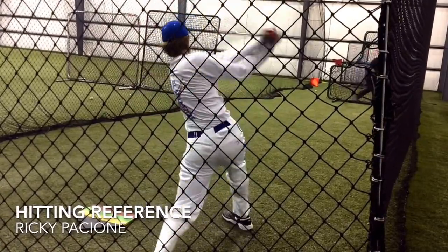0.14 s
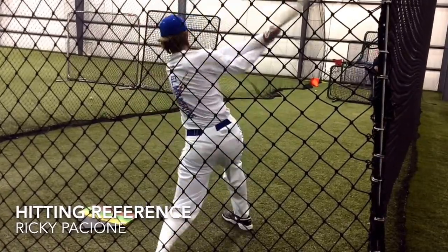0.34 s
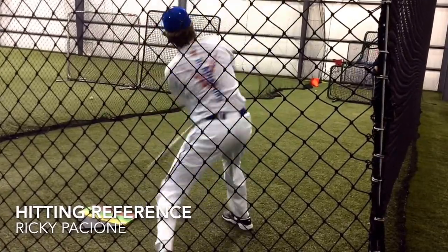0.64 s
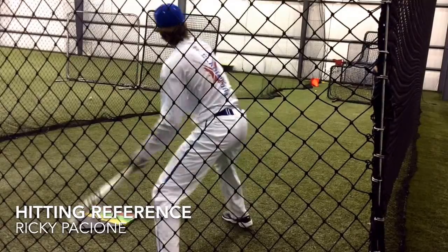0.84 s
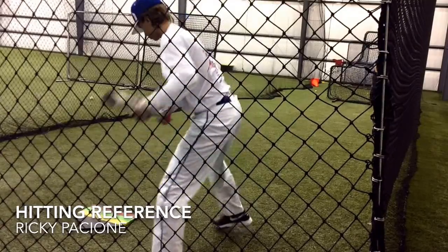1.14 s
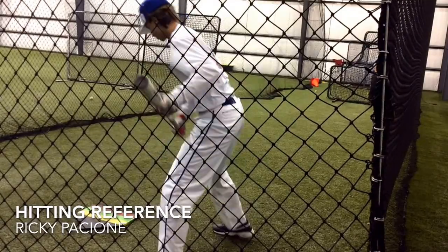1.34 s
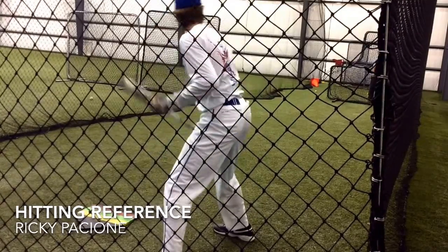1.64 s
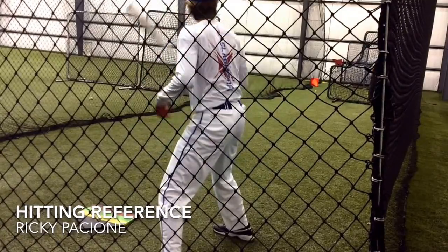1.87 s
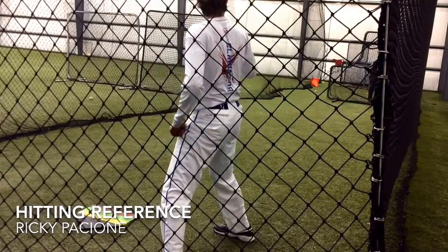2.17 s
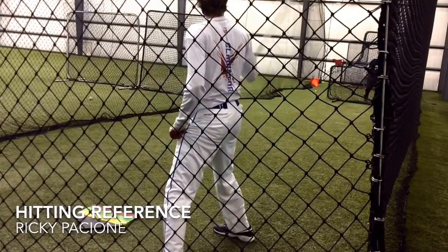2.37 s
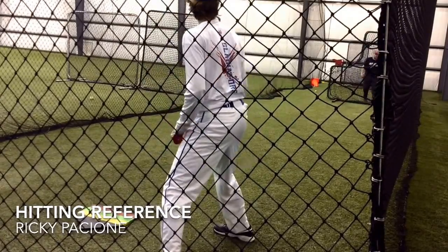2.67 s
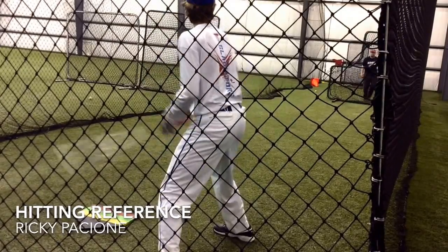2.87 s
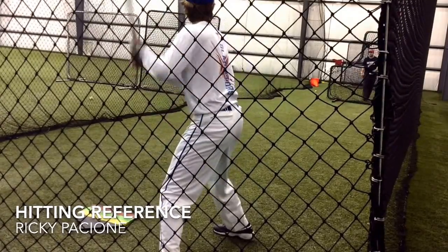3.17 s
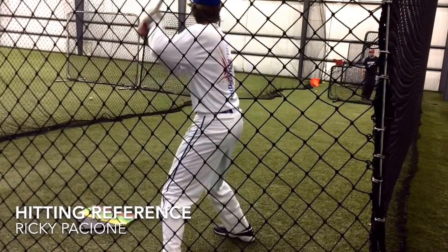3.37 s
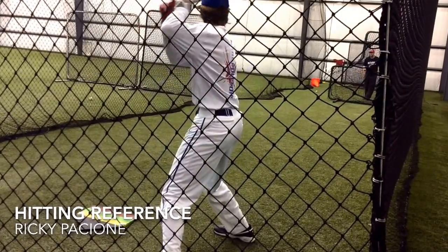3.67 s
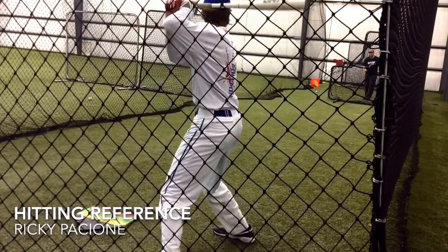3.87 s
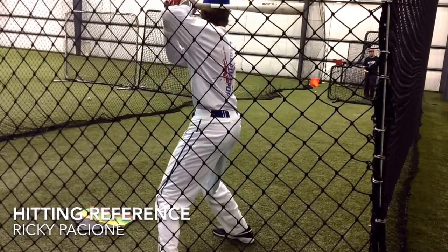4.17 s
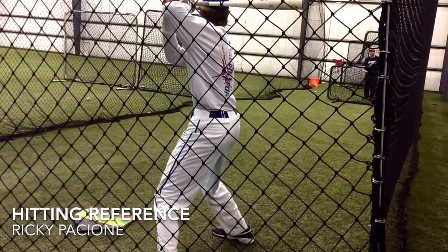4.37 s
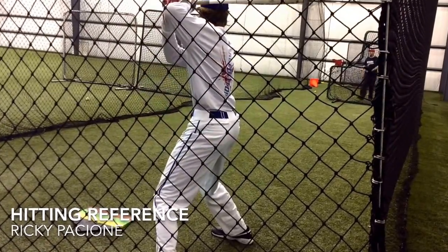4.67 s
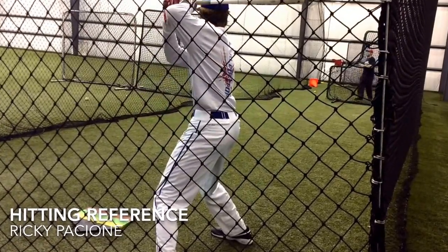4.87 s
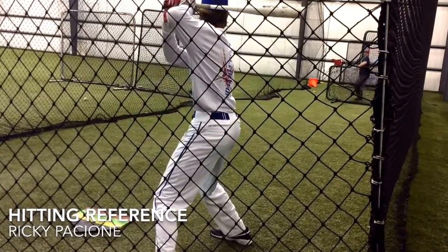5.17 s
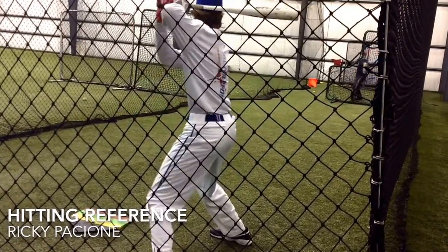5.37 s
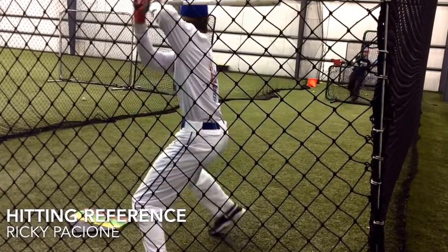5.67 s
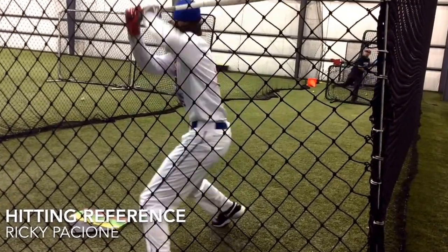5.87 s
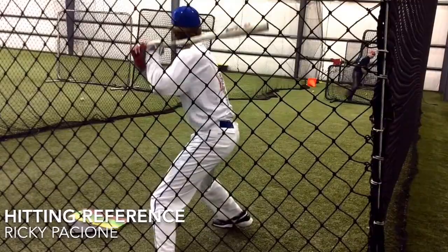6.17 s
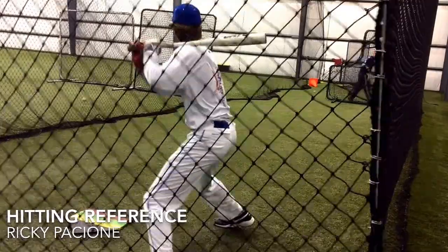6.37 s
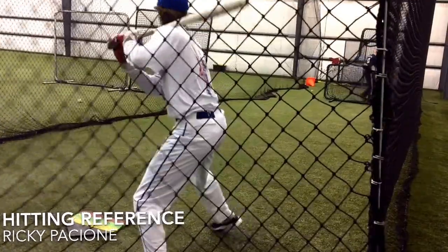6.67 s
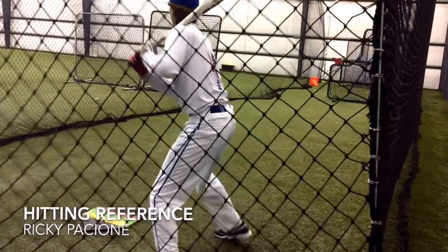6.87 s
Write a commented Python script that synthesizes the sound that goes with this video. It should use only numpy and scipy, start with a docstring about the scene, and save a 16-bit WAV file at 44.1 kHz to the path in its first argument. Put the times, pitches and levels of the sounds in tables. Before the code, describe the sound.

Right at the start, a metal bat hits a baseball with a sharp crack and a bright ring that echoes through a large hall for about a second. At 0.3 seconds the ball swishes faintly into a far net. Throughout, lamps buzz, a fan motor whines thinly and ventilation rumbles and hisses, all fairly quiet. A short dull thud on the turf comes at about 1.8 seconds, with much fainter taps around 2.8, 3.2 and 5.9 seconds. A low drone swells slightly around 3.5 seconds. At 6.4 seconds a pitch smacks loudly into the backstop right beside the microphone. The heavy sheet booms, knocks against its frame and flaps about four times, each weaker, while the netting rustles softly. Another small tap lands just before 7 seconds. The background dips briefly after both loud hits.

```python
"""Indoor batting cage, from behind the net.

A metal bat meets a ball and rings out through the hall; a few soft taps follow on the turf.
The next pitch smacks into the backstop beside the microphone, and the sheet booms, flaps and
knocks on its frame. Lamps buzz, a fan motor whines and the ventilation rumbles throughout.
The recorder's gain control ducks after both blows."""
import sys
import numpy as np
from scipy import signal
from scipy.fft import rfft, irfft, next_fast_len
from scipy.io import wavfile
from scipy.ndimage import uniform_filter1d, minimum_filter1d

SR = 44100
rng = np.random.default_rng(int(sys.argv[2]) if len(sys.argv) > 2 else 0)


def waveform_to_disk(signal):
    """Save audio, clipped to [-1, 1], as 16-bit WAV at the path in sys.argv[1]."""
    frames = np.transpose(np.atleast_2d(signal))
    scaled = np.clip(frames, -1, 1) * 32767
    samples = np.round(scaled).astype(np.int16)
    wavfile.write(sys.argv[1], SR, samples)


N = 310023
T = np.arange(N) / SR
LAMP_HZ, TOP_HZ = 120.05, 15400  # twice the mains rate; the recorder's upper limit
# blows on the backstop and its frame: (time [s], strength [dB], brightness [Hz])
BLOWS = [(6.4163, -5.5, 2200), (6.4177, -4.5, 18100), (6.4201, -16.5, 2500), (6.4241, -25, 8000),
         (6.427, -14.5, 9000), (6.46, -21.5, 4000), (6.468, -40, 2000), (6.493, -32, 3000),
         (6.520, -17, 800), (6.564, -25.5, 2510)]


def bat(direct_t60=0.14, tick_db=-19, tick_t60=0.055, build_s=0.0093):
    """The barrel's close modes beat and die quickly; the hall keeps each as a narrow, wavering band."""
    # barrel modes: (pitch [Hz], direct level [dB], hall level [dB], hall width [Hz], hall t60 [s])
    barrel = [(2460, -30, -25, 61, 1), (2493, -12, -21, 88, 0.48), (2702, -11, -21.5, 65, 1),
              (2764, -22, -29.5, 26, 0.91), (2916, -47, -27, 68, 1), (3630, -31, -32, 62, 0.6)]
    # the crack out in the hall: (frequency [Hz], octave level [dB], t60 [s])
    crack = [(100, -70, .5), (220, -49, 0.39), (424, -40.5, 0.33), (780, -29.5, 0.43), (1190, -32.5, 0.64),
             (1900, -23.5, 0.61), (3300, -22, 0.77), (4800, -32, 0.88), (8000, -31.5, 0.4),
             (11500, -31.5, 0.25), (15000, -49, 0.29)]
    # returns from walls and roof: (delay [s], level [dB])
    echoes = [(.033, -19), (0.058, -11), (.092, -12), (0.123, -24), (0.271, -20)]
    size = 2 * SR
    t = T[:size]
    ring = modes([(hz, db, direct_t60) for hz, db, *_ in barrel], size)
    out = ring + die_away(crack, size, late_db=-10.5, late_stretch=1.96)
    for hz, _, hall_db, width, t60 in barrel:
        out += undb(hall_db) * band(hz, width, size) * fade(t, t60) * rise(t, build_s)
    for s, db in echoes:
        # each surface smears the contact tick in its own way
        tick = noise(lambda f: np.exp(-np.log2(f / 1700) ** 2) / f, size) * fade(t, tick_t60)
        add(out, s, undb(db) * (ring + undb(tick_db) * tick))
    return out * np.minimum(t / 0.00094, 1)


def backstop(snap_db=12, scatter_db=-5, sting_swell_s=0.0005, build_s=0.0066):
    """Right by the microphone, each blow is a pulse, a short ring and a spray of near reflections."""
    # the smack, close up: (frequency [Hz], octave level [dB], t60 [s])
    smack = [(100, -33, 0.042), (220, -15, 0.082), (398, -28, 0.031), (734, -3.5, 0.036),
             (1090, -12.5, 0.088), (1720, -16, 0.023), (2640, -0.5, 0.036), (4260, -13, 0.029),
             (7600, -7.5, 0.039), (11500, -7, .014), (15000, -14, 0.014)]
    # its echo in the hall: (frequency [Hz], octave level [dB], t60 [s])
    smack_hall = [(45, -30, 0.58), (100, -30.5, 0.58), (200, -24, 0.42), (397, -23.5, 0.38),
                  (765, -29, 0.36), (1510, -27, 0.4), (2870, -26, 0.48), (4400, -36, 0.75),
                  (8000, -34.5, 0.46), (14000, -29.5, 0.18)]
    # modes of the backstop and its frame: (pitch [Hz], level [dB], t60 [s])
    frame = [(275, -15, 0.164), (366, -16, 0.14), (475, -12, 0.083), (640, -11.5, 0.014), (780, -7, 0.018),
             (863, -14, 0.054), (1270, -15, 0.031), (1490, -23, 0.028), (2330, -10, 0.027),
             (2940, -21, 0.037), (3340, -17, 0.026)]
    # the sting of the hardest blow: (centre [Hz], width [Hz], level [dB])
    sting = [(2590, 550, -8.5), (12500, 4300, -16.5)]
    out, t = np.zeros(N), T[:SR]
    for s, db, bright_hz in BLOWS:
        blow = undb(scatter_db) * die_away(smack, SR // 4) - modes(frame, SR // 4)
        add(blow, 0, undb(snap_db) * snap(smack))
        softness = signal.butter(1, bright_hz, fs=SR)  # a longer contact is duller
        add(out, s, undb(db) * signal.lfilter(*softness, blow))
    hardest_s = max(BLOWS, key=lambda blow: blow[1])[0]
    for hz, width, db in sting:
        add(out, hardest_s, undb(db) * swell(t, sting_swell_s) * band(hz, width, SR))
    hall = die_away(smack_hall, SR, late_db=-15, late_stretch=2.35)
    add(out, hardest_s, hall * rise(t, build_s))
    return out


def sheet(first_flap_s=6.555, swing_s=0.134, flap_db=-27, loss_db=3, shudder_db=-38):
    """The heavy sheet booms under the ball and shudders, then flaps once a swing, weaker each time."""
    # low modes of the sheet: (pitch [Hz], level [dB], lag behind the smack [s])
    booms = [(194, -14, 0.0005), (108.5, -13.5, 0.0188), (59, -22, 0.012)]
    # each flap in turn: (pitch [Hz])
    flap_pitches = [97.3, 143.6, 164.8, 135]
    out, t = np.zeros(N), T[:SR // 2]
    smack_s = BLOWS[0][0]
    for hz, db, lag in booms:
        boom = np.sin(2 * np.pi * hz * t) + 0.19 * band(hz, hz / 2, len(t))
        add(out, smack_s + lag, undb(db) * swell(t, peak_s=0.013) * boom)
    for k, hz in enumerate(flap_pitches):
        lower_mode = undb(-11.5) * np.sin(2 * np.pi * 0.627 * hz * t)
        flap = np.sin(2 * np.pi * hz * t) + lower_mode + 0.15 * band(hz, hz / 2, len(t))
        envelope = undb(flap_db - k * loss_db) * swell(t, peak_s=0.023)
        add(out, first_flap_s + k * swing_s, envelope * flap)
    shudder = fade(T[:SR], t60=2.8) * band(hz=130, width=90, size=SR)
    add(out, smack_s, undb(shudder_db) * shudder)
    return out


def taps(contact_s=0.00091, click_t60=0.026, hall_db=-26, hall_t60=0.41, click_hall_db=-14):
    """Bat, shoes and loose balls on the turf: a damped thud and a dull click, with a faint hall wash."""
    # taps: (time [s], thud level [dB], pitch [Hz], t60 [s], click strength [dB], click top [Hz])
    contacts = [(0.257, -44, 318, .08, -46, 1000), (1.826, -21.5, 364, 0.029, -43, 1500),
                (1.847, -33, 344, 0.04, -36, 2300), (1.879, -43, 380, 0.051, -53, 1800),
                (1.891, -46, 357, .04, -43, 1800), (2.825, -56, 654, .03, -50, 1500),
                (2.865, -55, 323, .05, -61, 1500), (3.171, -44.5, 386, 0.053, -54, 1200),
                (5.873, -47.5, 397, .04, -59, 1500), (6.9487, -27.5, 490, 0.015, -33.5, 4000),
                (6.991, -50, 450, .03, -37, 2500)]
    out, t = np.zeros(N), T[:SR // 2]
    wash = fade(t, hall_t60) * rise(t, 0.0076)
    for s, db, hz, t60, click_db, top_hz in contacts:
        thud = np.sin(2 * np.pi * hz * t) * fade(t, t60) * rise(t, contact_s)
        thud += undb(hall_db) * wash * band(hz, hz, len(t))
        click = noise(lambda f: 1 / (1 + (f / top_hz) ** 8), len(t))
        click *= fade(t, click_t60) + undb(click_hall_db) * wash
        add(out, s, undb(db) * thud + undb(click_db) * click / 2)
    return out


def far_net(arrival_s=0.28, give_s=0.0033):
    """The far net gives way gradually under the batted ball, so its swish has a soft start."""
    # the swish: (frequency [Hz], octave level [dB], t60 [s])
    swish = [(150, -62, 0.27), (322, -49, 0.26), (500, -68, 0.19), (850, -59, 0.17), (1300, -63, 0.23),
             (2200, -37, 0.39), (3600, -40, 0.49), (6000, -46, .5), (10000, -43.5, 0.32), (15000, -64, .25)]
    out = np.zeros(N)
    add(out, arrival_s, die_away(swish, SR) * rise(T[:SR], give_s))
    return out


def rustle(centre_hz=2200, octaves=1.4, patchy_db=4, attack_s=0.044, release_t60=0.67):
    """Cords and cloth rub in short uneven spurts; each rustle rises, holds and dies away."""
    # the batter's stride and the shaken net: (start [s], length [s], level [dB])
    moves = [(6.077, 0.45, -66), (6.53, 0.22, -53), (6.978, 0.06, -52)]
    spurts = undb(wander(patchy_db, per_second=200))
    rub = noise(lambda f: np.exp(-(np.log2(f / centre_hz) / octaves) ** 2) / f, N)
    motion = np.zeros(N)
    for s, length, db in moves:
        envelope = np.minimum(T / attack_s, 1) * fade(np.maximum(T - length, 0), release_t60)
        add(motion, s, undb(db) * envelope)
    return rub * spurts * motion


def lamps(scatter_db=1.5, waver=0.16):
    """Lamp ballasts overhead buzz at twice the mains rate; the hall scrambles the overtones' phases."""
    # outline of the buzz: (frequency [Hz], level per overtone [dB])
    buzz = [(120, -69.5), (240, -87), (1200, -77.5), (1450, -76.5), (1750, -85), (2400, -77.5),
            (3000, -77.5), (4200, -78), (5000, -81.5), (5500, -76.5), (6100, -70.5), (7500, -79),
            (9200, -79), (10000, -82), (12000, -79), (15000, -95.5)]
    # overtones at which the lamp housings resonate: (frequency [Hz], level [dB])
    housings = [(360, -72), (480, -83), (600, -76), (720, -77), (840, -77), (960, -74), (1080, -80),
                (2881, -73), (3842, -65), (3962, -74), (4442, -68), (5760, -71), (6002, -72), (6363, -67),
                (6603, -61), (6723, -59), (7083, -63), (7203, -60), (7803, -63), (7923, -66), (8043, -60),
                (8163, -61), (8404, -60), (8524, -67), (9244, -65), (9964, -72), (10084, -67), (10204, -66),
                (10324, -68), (10684, -72)]
    overtones = LAMP_HZ * np.arange(1, int(TOP_HZ / LAMP_HZ))
    levels = read(buzz, overtones) + scatter_db * rng.standard_normal(len(overtones))
    for hz, db in housings:
        levels[np.argmin(abs(overtones - hz))] = db
    return sum(tone(hz, db, waver) for hz, db in zip(overtones, levels))


def fan_motor(gain_db=1, waver=0.18):
    """The rotor slots give a thin, unsteady whine, with sidebands at twice the mains rate."""
    # lines of the whine: (frequency [Hz], relative level [dB])
    whine = [(1543, -81), (1783, -78), (2023, -65), (2143, -76), (2263, -84), (2383, -78), (2503, -84),
             (2623, -85), (3806, -76), (4166, -82), (4286, -83)]
    return sum(tone(hz, db + gain_db, waver) for hz, db in whine)


def ventilation(rumble_top_hz=300, sag_db_per_s=0.62, sizzle=0.2, drone_db=-53, peak_s=3.58):
    """Room tone: a slowly sinking rumble, a drone that swells once, a hiss that pulses with the lamps."""
    # hall air and ventilation: (frequency [Hz], octave level [dB])
    room_tone = [(25, -74), (55, -64), (110, -59.5), (190, -56), (250, -72.5), (330, -71), (500, -79.5),
                 (1000, -76), (2000, -74), (4000, -65.5), (5200, -67.5), (8000, -53.5), (10000, -56.5),
                 (12000, -69), (15000, -71)]

    def density(hz):
        return undb(read(room_tone, hz)) ** 2 / (np.maximum(hz, 20) * np.log(2))

    air = noise(density, N) * np.sqrt(np.mean(density(frequencies(2 ** 19))) * SR / 2)
    rumble = signal.sosfiltfilt(signal.butter(2, rumble_top_hz, fs=SR, output="sos"), air)
    hiss = (air - rumble) * (1 + sizzle * np.sin(2 * np.pi * LAMP_HZ * T))
    spread_s = np.where(T < peak_s, 0.55, 0.33)  # slow rise, quicker fall
    surge = np.exp(-((T - peak_s) / spread_s) ** 2)
    drone = undb(drone_db) * surge * band(hz=156, width=71, size=N)
    return rumble * undb(0.65 - sag_db_per_s * T) + drone + hiss


def modes(table, size):
    """Damped sines started together by one blow."""
    t = T[:size]
    return sum(undb(db) * np.sin(2 * np.pi * hz * t) * fade(t, t60) for hz, db, t60 in table)


def snap(table, size=2048):
    """One sharp pressure pulse of unit energy, coloured by a table of octave levels."""
    hz = frequencies(size, floor_hz=20)
    cepstrum = irfft(np.log(undb(read(table, hz)) / np.sqrt(hz)))
    pulse = irfft(np.exp(rfft(2 * cepstrum[:size // 2], size)))  # energy packed at the start
    return pulse / np.linalg.norm(pulse)


def die_away(table, size, late_db=-100, late_stretch=1.7):
    """Third-octave noise bands, each with its own decay; the hall's far end holds a weaker, longer one."""
    out, t = 0, T[:size]
    for hz in 1000 * 2 ** (np.arange(-14, 13) / 3):
        t60 = read(table, hz, column=2)
        envelope = np.hypot(fade(t, t60), undb(late_db) * fade(t, t60 * late_stretch))
        out += undb(read(table, hz)) * envelope * band(hz, hz / 4, size) / np.sqrt(3)
    return out


def tone(hz, db, waver):
    """A steady pitch whose level wavers as the air in the hall moves."""
    sway = 1 + wander(waver, per_second=16)
    return np.sqrt(2) * undb(db) * sway * np.sin(2 * np.pi * (hz * T + rng.random()))


def wander(depth, per_second):
    """Random values around zero, joined by straight lines."""
    knots = T[::SR // per_second]
    return np.interp(T, knots, depth * rng.standard_normal(len(knots)))


def noise(power, size):
    """Noise of rms 1 whose power spectrum is the given function of frequency."""
    length = next_fast_len(size)
    hz = frequencies(length)
    phases = np.exp(2j * np.pi * rng.random(len(hz)))
    x = irfft(np.sqrt(power(hz)) * phases, length)[:size]
    return x / np.std(x)


def band(hz, width, size):
    """Noise in one bell-shaped band."""
    return noise(lambda f: np.exp(-2 * ((f - hz) / width) ** 2), size)


def rise(t, time_s):
    """A soft onset that climbs from 0 towards 1."""
    return 1 - np.exp(-t / time_s)


def fade(t, t60):
    """Exponential decay that loses 60 dB in t60 seconds."""
    return np.exp(-np.log(1000) * t / t60)


def swell(t, peak_s):
    """A soft bump that reaches 1 after peak_s seconds and dies away."""
    return (t / peak_s * np.exp(1 - t / peak_s)) ** 2


def undb(db):
    """Decibels to gain."""
    return 10 ** (np.asarray(db) / 20)


def frequencies(size, floor_hz=1):
    """The frequencies of a spectrum's bins, kept above zero."""
    return np.maximum(np.fft.rfftfreq(size, 1 / SR), floor_hz)


def read(table, hz, column=1):
    """One column of a table, joined by straight lines over log frequency."""
    table = np.array(table)
    return np.interp(np.log(hz), np.log(table[:, 0]), table[:, column])


def add(out, s, sound):
    """Mix a sound in at time s."""
    i = max(int(s * SR), 0)
    out[i:i + len(sound)] += sound[:max(len(out) - i, 0)]


def scene():
    """Everything at one microphone behind the cage net."""
    out = lamps() + fan_motor() + ventilation() + far_net() + backstop() + sheet() + rustle() + taps()
    add(out, 0, bat())
    return out[None]


def gain_control(x, threshold_db=-21, slope=0.65, hold_s=0.26, release_s=0.083):
    """Loud treble pulls the recorder's gain down at once; it is held there, then let back up."""
    treble = signal.sosfilt(signal.butter(2, 1800, "high", fs=SR, output="sos"), x)
    level = np.sqrt(np.abs(uniform_filter1d(treble ** 2, SR // 40)) + 1e-12)
    wanted = np.minimum(1, undb(threshold_db) / level) ** slope
    hold, release = int(hold_s * SR), int(release_s * SR)
    held = minimum_filter1d(wanted, hold, origin=(hold - 1) // 2, mode="nearest")
    eased = uniform_filter1d(held, release, origin=(release - 1) // 2, mode="nearest")
    return x * np.minimum(held, eased)


def record(dry):
    """The phone drops the deep bass, rides its gain, rounds the highest peaks and cuts the top."""
    low_cut = signal.butter(2, 38, "high", fs=SR, output="sos")
    high_cut = signal.ellip(8, 0.2, 70, TOP_HZ, fs=SR, output="sos")
    ducked = gain_control(signal.sosfilt(low_cut, dry[0]))
    rounded = ducked / (1 + ducked ** 6) ** (1 / 6)
    return signal.sosfilt(high_cut, rounded)[None]


dry = scene()
out = record(dry)
waveform_to_disk(out)
```